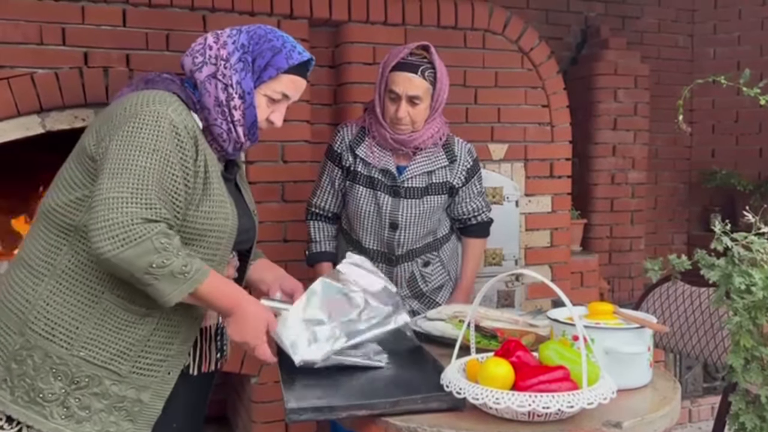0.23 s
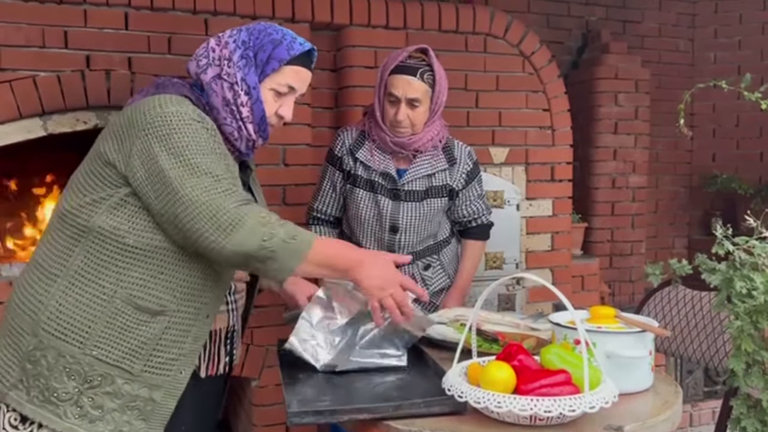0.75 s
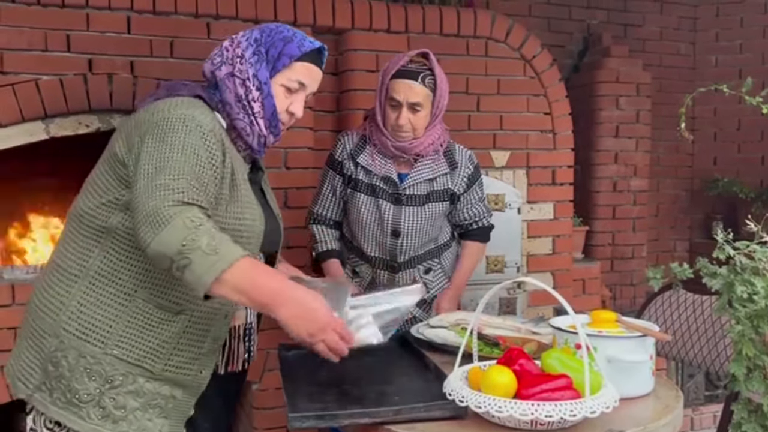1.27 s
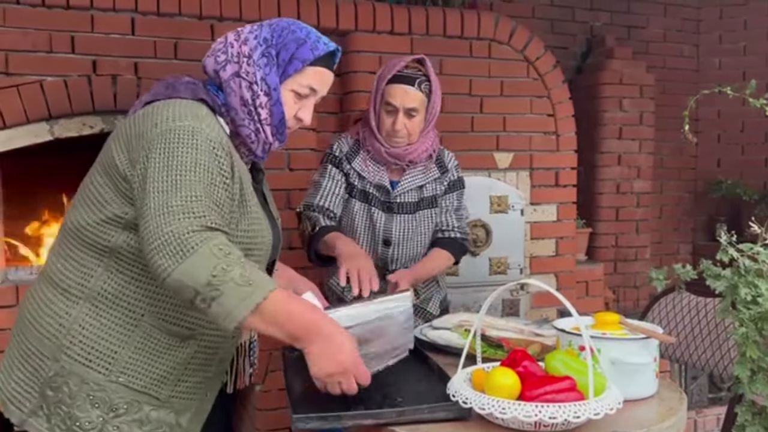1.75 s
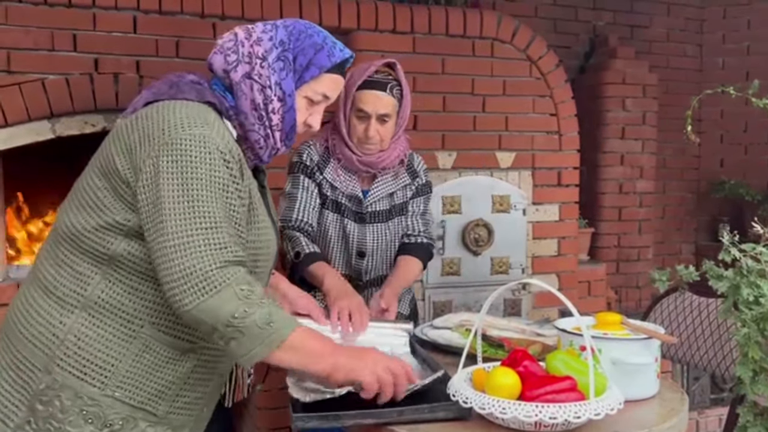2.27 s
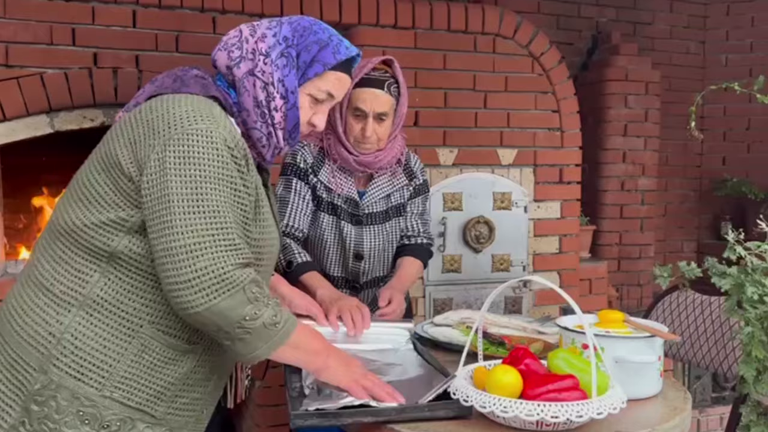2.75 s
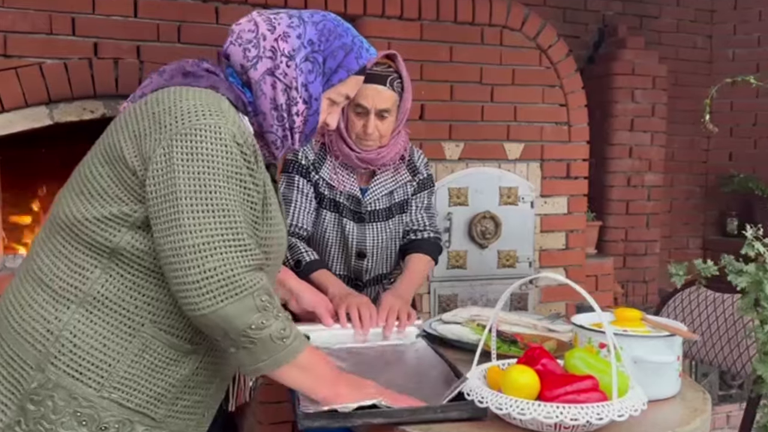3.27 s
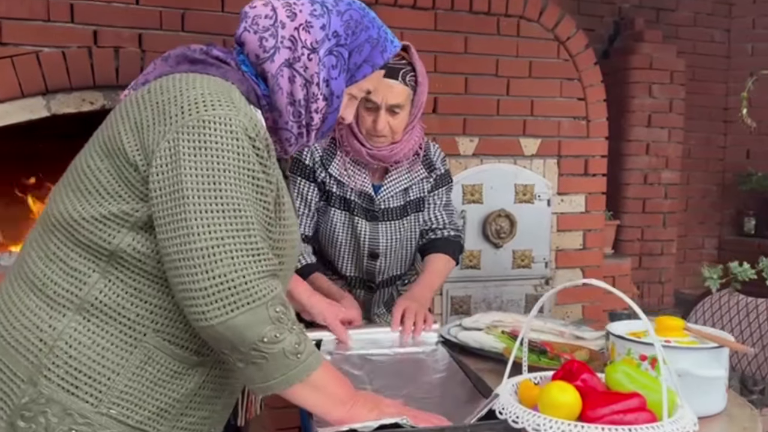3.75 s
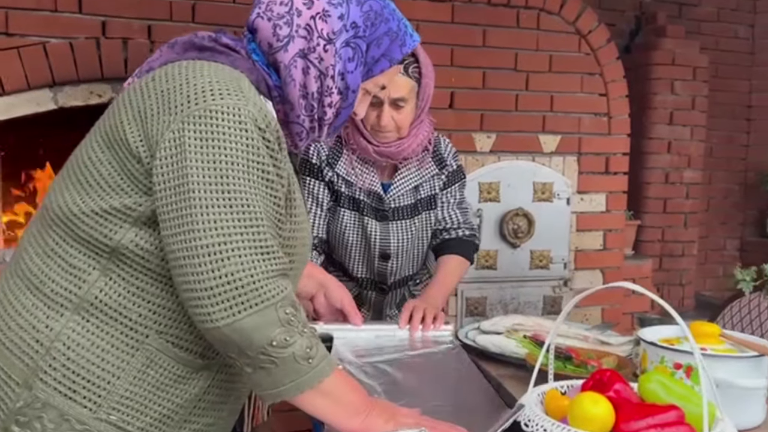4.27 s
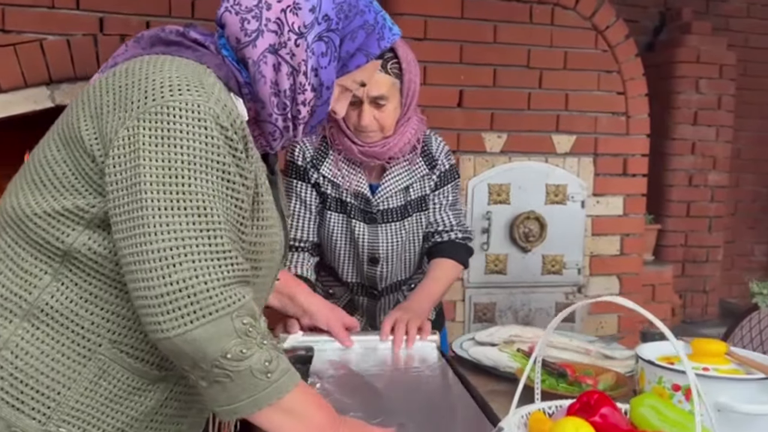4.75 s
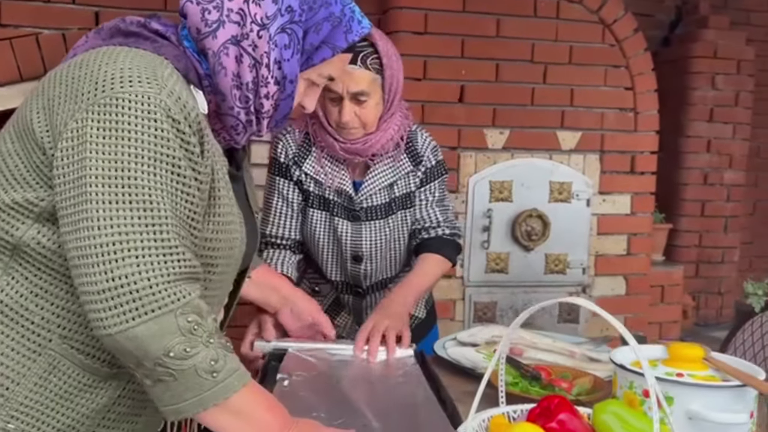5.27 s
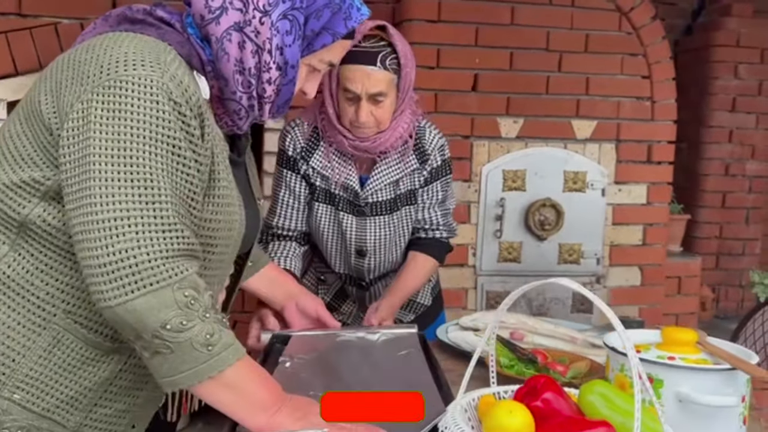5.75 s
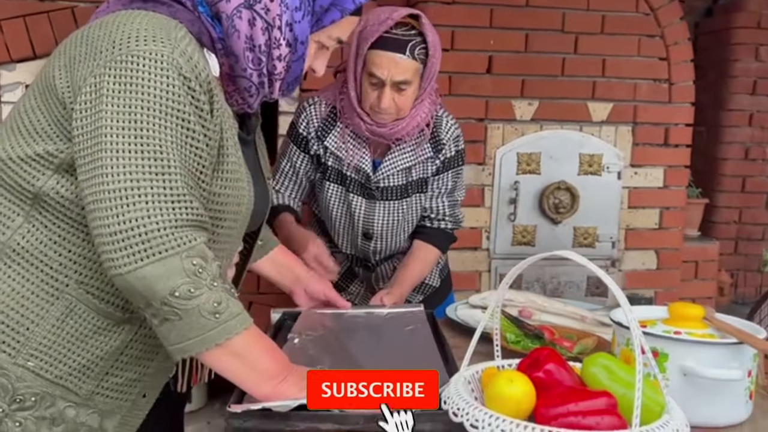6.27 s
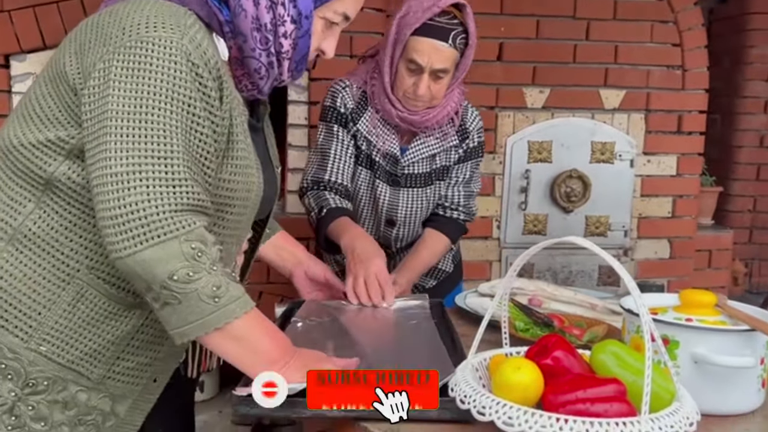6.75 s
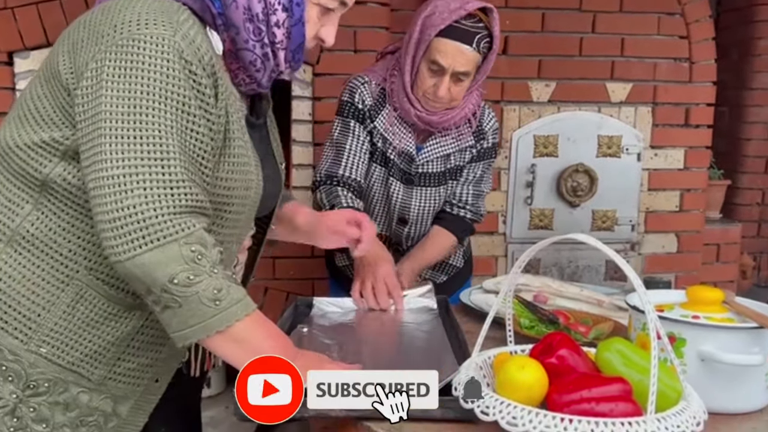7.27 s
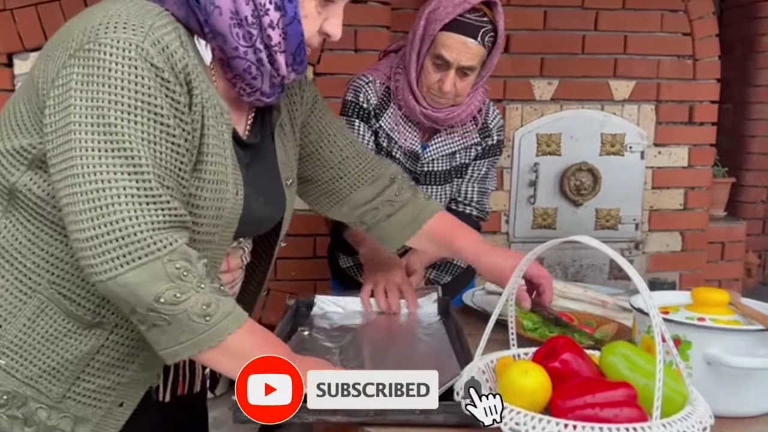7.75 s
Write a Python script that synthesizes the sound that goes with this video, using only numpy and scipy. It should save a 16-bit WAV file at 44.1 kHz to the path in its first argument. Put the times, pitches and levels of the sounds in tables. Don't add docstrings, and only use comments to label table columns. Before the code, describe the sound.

Dry, bright foil rustling with sharp crease snaps, small tray knocks and rim ticks, while light wind rumbles softly against the microphone in a yard.

```python
import sys
import numpy as np
from scipy import signal
from scipy.fft import rfft, irfft, next_fast_len
from scipy.io import wavfile
from scipy.ndimage import uniform_filter1d

SR = 44100
rng = np.random.default_rng(int(sys.argv[2]) if len(sys.argv) > 2 else 0)


def boost(x):
    u = np.asarray(x, float) / 20
    return 10 ** u


def file_out(sig):
    cols = np.atleast_2d(sig).T
    lim = np.clip(cols, -1, 1)
    pcm = np.round(lim * 32767).astype(np.int16)
    wavfile.write(sys.argv[1], SR, pcm)


N = 353625
T = np.arange(N) / SR
CREASE_HZ, FACET_HZ = 7950, 1800

# peak [t/s], buffeting [level/dB], rise [t/s], fall [t/s], rasp re buffeting [level/dB]
GUSTS = [(0.067, -44, 0.14, 0.27, -20), (0.301, -40.5, 0.17, 0.14, 0.2), (0.625, -45.5, 0.12, 0.092, -7.8),
         (0.808, -51, 0.18, 0.53, -0.5), (1.472, -50, 0.22, 0.081, -6.5), (1.909, -48.5, 0.37, 0.19, -5.5),
         (2.364, -50, 0.39, 0.032, -29), (2.466, -44.5, 0.038, 0.52, -13.5), (2.829, -47.5, 0.28, 0.32, -4),
         (3.151, -44, 0.089, 0.025, -19), (3.252, -47.5, 0.035, 0.063, -11),
         (3.412, -47.5, 0.074, 0.48, -22.5), (3.752, -42.5, 0.11, 0.019, -9.5),
         (4.185, -40, 0.27, 0.12, -16), (4.364, -42, 0.019, 0.27, -22.5), (4.778, -46.5, 0.34, 0.2, -13),
         (4.952, -46.5, 0.093, 0.5, -2.5), (5.314, -53.5, 0.053, 1, -1.5), (5.967, -52.5, 0.82, 0.71, -6.5),
         (6.555, -47, 0.28, 0.28, -8), (6.864, -45, 0.26, 0.38, -6.5), (7.17, -33.5, 0.13, 0.038, -14),
         (7.269, -43, 0.1, 0.031, -4), (7.738, -51.5, 0.062, 0.019, -1.5)]
# [f/Hz], [level/dB per Hz]
RUMBLE_TONE = [(15, -36), (25, -11), (46, 1.5), (65, 5), (151, -9), (200, -17.5), (260, -20.5), (440, -120)]
# [t/s], peak [level/dB]
EDDY_SLAPS = [(0.259, -33.5), (0.31, -27.5), (0.428, -34.5), (2.469, -33.5), (2.737, -37.5), (2.818, -50),
              (2.926, -35.5), (3.018, -32), (3.6, -37), (3.724, -33), (4.006, -36.5), (4.119, -36),
              (4.167, -30.5), (4.368, -34.5), (6.848, -44), (7.099, -41), (7.141, -31.5), (7.168, -39),
              (7.238, -39)]
# [t/s], peak [level/dB], pitch [f/Hz]
FINGER_TAPS = [(0.6, -49.5, 834), (2.124, -46.5, 326), (3.23, -48.5, 274), (4.059, -49, 232),
               (4.536, -52.5, 577), (4.963, -41.5, 508), (5.03, -49.5, 815), (5.611, -44, 468),
               (6.656, -48, 353), (7.745, -52.5, 258)]
# [t/s], peak [level/dB], pitch [f/Hz]
RIM_TICKS = [(0.2867, -34, 2160), (1.293, -42, 2480), (2.5845, -36.5, 2140), (4.8145, -54, 2500),
             (5.2689, -32.5, 2190), (5.3303, -30.5, 2360), (5.462, -34.5, 2170), (5.5144, -31.5, 2290),
             (5.6072, -38, 2250), (6.4617, -33.5, 1650), (7.0843, -35, 2260), (7.252, -32, 2420),
             (7.7322, -29.5, 3280), (7.8017, -39.5, 1820), (7.87, -54, 2130)]
# [t/s], peak [level/dB], body re peak [level/dB]
LARGE_POPS = [(0.4567, -35, -3), (2.4273, -27, -12.5), (2.5805, -16, -18), (3.2186, -31, -22),
              (3.626, -27.5, -10), (3.657, -33, -29), (3.685, -22, -22), (3.8217, -28, -16),
              (3.8412, -18.5, -24), (3.9875, -23, -32.5), (4.2266, -28, -26), (4.6896, -33, -10),
              (4.8112, -20, -24), (5.03, -21, -23), (5.224, -26, -16.5), (5.33, -26, -22),
              (5.4615, -32.5, -7), (5.514, -31, -18), (5.853, -26, -18), (5.895, -19, -35),
              (5.9613, -16.5, -32), (7.01, -23, -4), (7.2958, -28, -10), (7.381, -24.5, -4),
              (7.6595, -28, -12), (7.7147, -23.5, -10), (7.7302, -17, -8), (7.7527, -17, -10),
              (7.745, -21, -8), (7.871, -16, -4)]
# [t/s], peak [level/dB], body re peak [level/dB]
SHARP_CRACKS = [(0.3991, -21, -8), (0.6136, -30, -6), (0.7164, -24, -10), (0.9184, -19, -10),
                (1.8009, -27, 2), (2.1366, -21, -16), (2.402, -33, -4), (2.4644, -33, 0),
                (2.5138, -26, -13), (2.9164, -16, -15), (2.9408, -20, -7), (2.9922, -18, -6),
                (3.08, -26, -5), (3.1818, -27, -11), (3.532, -50, 16), (3.5385, -29.5, -5),
                (3.5844, -28.5, -13.5), (3.7126, -31, -4), (3.8717, -24, -10), (3.9146, -15, -18),
                (4.3855, -15, -23), (4.7387, -19, -13), (5.1283, -27, -4), (5.2351, -28, 1.5),
                (5.2441, -29, -11), (5.269, -28.5, 0), (5.293, -27, -12), (5.4661, -29, -10),
                (5.6107, -23, -13), (6.0073, -25, -18), (6.2214, -25, -9), (6.3261, -28, -11),
                (6.3331, -18, -14), (6.374, -32, -7), (6.4049, -33.5, -5), (6.8649, -23, -13),
                (7.1039, -14, -16), (7.1687, -21, 0), (7.256, -30, 1), (7.2889, -28, -14),
                (7.3169, -30, -14), (7.3503, -31.5, -0.5), (7.3742, -25, -9), (7.3932, -25, -6),
                (7.4151, -28, -16), (7.4326, -21, -10), (7.4585, -31, -9), (7.4875, -33, 4),
                (7.496, -28, -1), (7.5214, -21.5, -1.5), (7.6327, -41, -9), (7.685, -28, -8),
                (7.708, -26, -2), (7.7354, -23, -4), (7.7713, -19, -9), (7.8048, -24, -1),
                (7.8152, -22, -9), (7.8452, -18, -12), (7.9634, -32, -11), (8.0143, -24, -15)]
# peak
# [t/s], snaps [level/dB], rise [t/s], fall [t/s], facet ring re snaps [level/dB]
HAND_STROKES = [(0.005, -45.5, 0.057, 0.013, -0.5), (0.231, -36, 0.1, 0.073, -2), (0.39, -42, 0.52, 0.031, -2),
                (0.49, -45, 0.044, 0.04, 0.5), (0.545, -33, 0.053, 0.032, -3.5),
                (0.613, -36.5, 0.035, 0.068, -2.5), (0.745, -45.5, 0.163, 0.012, -2.5),
                (0.844, -36, 0.18, 0.055, -2), (0.931, -35.5, 0.055, 0.16, -2.5),
                (1.075, -38, 0.23, 0.019, -2.5), (1.17, -40.5, 0.056, 0.071, -2.5),
                (1.299, -34.5, 0.075, 0.099, -4), (1.42, -37.5, 0.041, 0.039, -4),
                (1.583, -38.5, 0.18, 0.1, -3.5), (1.749, -39, 0.053, 0.086, -3),
                (1.975, -38.5, 0.079, 0.027, -5), (2.1, -40, 0.22, 0.18, -3), (2.23, -40, 0.42, 0.074, -4.5),
                (2.34, -38.5, 0.11, 0.091, -4), (2.52, -41.5, 0.064, 0.04, -2.5),
                (2.63, -31.5, 0.048, 0.13, -3.5), (2.841, -33, 0.08, 0.12, -3.5), (2.927, -39, 0.013, 0.49, -7),
            (3.276, -32, 0.085, 0.085, -4.5), (3.472, -49.5, 0.028, 0.064, -2),
            (3.543, -48, 0.0087, 0.052, -3), (3.669, -38.5, 0.047, 0.054, -3.5),
            (3.844, -35, 0.052, 0.14, -7), (3.913, -46.5, 0.13, 0.053, -1),
            (4.026, -35.5, 0.07, 0.093, -5.5), (4.249, -42.5, 0.15, 0.16, -6.5),
            (4.483, -29.5, 0.064, 0.077, -7.5), (4.634, -38, 0.061, 0.037, -7.5),
            (4.705, -31, 0.032, 0.037, -7.5), (4.835, -36, 0.018, 0.14, -3.5),
            (4.972, -34.5, 0.074, 0.23, -8.5), (5.181, -37.5, 0.053, 0.011, -2),
            (5.254, -47.5, 0.79, 0.12, -0.86), (5.365, -36.5, 0.056, 0.035, -5.5),
                (5.616, -39, 0.14, 0.079, -4), (5.782, -40.5, 0.042, 0.025, -3),
           (5.905, -35, 0.049, 0.022, -3.5), (5.967, -36.5, 0.13, 0.12, -4),
           (6.093, -33.5, 0.046, 0.043, -4), (6.188, -43, 0.03, 0.076, -1.4),
           (6.232, -40.0, 0.023, 0.035, -2.5), (6.313, -43.5, 0.019, 0.013, -2.5),
           (6.482, -36, 0.1, 0.06, -3.5), (6.577, -43, 0.143, 0.39, -3.7), (6.767, -33.5, 0.093, 0.075, -3),
           (6.917, -34.5, 0.097, 0.072, -4), (7.045, -36, 0.081, 0.17, -3.5),
           (7.161, -36.5, 0.067, 0.14, -3), (7.32, -46.5, 0.032, 0.026, 0),
           (7.389, -41, 0.042, 0.034, -3.5), (7.537, -42.5, 0.11, 0.033, -5),
           (7.742, -37.5, 0.063, 0.054, -3.5), (7.868, -36, 0.083, 0.046, -5),
           (7.954, -45.5, 0.021, 0.17, -4.5), (8.006, -43, 0.0081, 0.148, -3.5),
                (0.3, -51.5, 0.044, 0.06, 3.5), (0.26, -52.5, 0.086, 0.12, -0.5), (5.08, -48, 0.12, 0.16, -0.5),
            (7.818, -36, 0.004, 0.02, -6.5), (1.285, -42, 0.011, 0.046, -3.5),
            (2.583, -34.5, 0.0052, 0.044, -3), (2.67, -36.5, 0.024, 0.025, -2),
            (3.8, -39, 0.0032, 0.027, -10), (4.39, -40, 0.0036, 0.05, -9),
            (4.445, -31.5, 0.056, 0.04, -8.5), (4.51, -36, 0.022, 0.017, -11),
            (4.74, -33, 0.011, 0.037, -9.5), (4.814, -34.5, 0.0027, 0.046, -4.5),
            (4.86, -31, 0.025, 0.014, -18), (7.661, -47, 0.002, 0.027, -4.5),
            (5.463, -51, 0.002, 0.03, -0.5), (7.707, -43, 0.003, 0.026, -7),
            (3.04, -42, 0.059, 0.065, -2.5), (4.945, -49, 0.03, 0.13, 2),
            (5.272, -50.5, 0.0097, 0.022, 2.5), (5.331, -48.5, 0.011, 0.0099, 2),
            (5.463, -50, 0.002, 0.035, 1.5), (5.516, -48.5, 0.012, 0.014, 2),
            (6.2, -44, 0.004, 0.019, -3.5), (7.81, -38.5, 0.014, 0.04, -4), (1.302, -38.5, 0.02, 0.017, -3),
            (1.35, -43, 0.02, 0.015, -4.5), (1.732, -42.5, 0.004, 0.036, -3.5),
            (1.552, -43, 0.015, 0.015, -3.5), (5.57, -48.5, 0.08, 0.08, -0.5),
            (5.41, -50, 0.05, 0.04, -0.5)]
# [t/s], spread of snap sizes [level/dB]
SNAP_SPREAD = [
    (0, -1.8),
    (2.5, 1.5),
    (3.6, 1),
    (5.3, 3.5),
    (6.8, -2.5),
    (7.3, 5),
    (8.02, 9),
]
# [f/Hz], left [level/dB], right [level/dB]
PORT_COLOUR = [(517, -12, -13.5), (1120, -10, -14.5), (1685, -9, -11), (1890, -11, -13), (2570, -8.5, -9),
               (3390, -6, -13), (4970, -6, -15.5), (6060, -8.5, -10.5), (7130, -5, -8.5), (7870, -6, -6.5),
               (8170, -1.5, -7), (8900, -5.5, -4.5), (10040, -8.5, -9), (10900, -14.5, -15.5),
               (11600, -16.5, -16.5), (11800, -22, -22)]
# [f/Hz], likeness [0-1], how far right leads [radians]
PORT_LIKENESS = [(600, 0.85, -0.1), (1130, 0.65, -0.3), (1440, 0.05, -0.6), (2140, 0.8, 0),
                 (2900, 0.7, -2.8), (3500, 0.3, -1.8), (4000, 0.55, -0.3), (6600, 0.45, -0.5),
                 (7450, 0.35, -1.5), (7950, 0.85, 0), (8300, 0.93, 0), (8700, 0.93, 0.2), (9800, 0.62, 1.9),
                 (10400, 0.82, 3.1), (11600, 0.75, 3.1)]
# [t/s], from [f/Hz], to [f/Hz]
TREBLE_OPENINGS = [(0.029, 10500, 11200), (0.119, 11050, 11350), (0.189, 10500, 10900),
                   (0.25, 10500, 10900), (0.337, 10500, 11150), (0.43, 10500, 11550), (0.52, 10850, 11850),
                   (0.589, 10500, 11150), (0.662, 10500, 11300), (0.778, 10500, 11750),
                   (0.871, 10500, 11150), (1.01, 10500, 11550), (1.234, 10500, 10950),
                   (1.373, 10500, 11550), (1.602, 10500, 11150), (1.756, 10500, 11750),
                   (1.942, 10500, 11150), (2.011, 10500, 11150), (2.136, 10500, 10700),
                   (2.276, 10500, 10900), (2.441, 10500, 11150), (2.612, 10500, 11150),
                   (2.72, 11450, 11850), (3.088, 10500, 11600), (3.413, 10500, 11100), (3.59, 10500, 11100),
                   (3.741, 10500, 11050), (3.901, 10500, 11000), (4.124, 10500, 11150),
                   (4.438, 10500, 11550), (4.563, 10500, 11650), (4.647, 10850, 11850),
                   (4.809, 10500, 11150), (4.972, 10500, 11550), (5.065, 10650, 11000),
                   (5.291, 10500, 11600), (5.373, 10500, 11650), (5.599, 10500, 11150),
                   (5.692, 10750, 11100), (5.849, 10500, 11850), (5.93, 10500, 10900),
                   (6.101, 10500, 11600), (6.177, 10500, 11150), (6.255, 10500, 11150),
                   (6.438, 10500, 11850), (6.551, 10500, 11150), (6.83, 10500, 11700),
                   (7.004, 10500, 11150), (7.073, 10500, 11100), (7.143, 10850, 11800),
                   (7.245, 10500, 11500), (7.52, 10500, 10850), (7.602, 10500, 11100),
                   (7.761, 10500, 11850), (7.906, 10500, 11850), (7.996, 10500, 11600)]
# [f/Hz], centre [level/dB], side [level/dB]
ROUNDING_STEPS = [(170, -25, 6), (860, -15, 0), (1200, -10, -5), (1550, -1, -1), (1900, 1, 9),
                  (2240, -1, 9), (2580, 4, 5), (2920, 10, -1), (3270, 3, -2), (3600, -5, -3), (3950, -4, 2),
                  (4300, -6, -3), (4800, -7, -6), (5330, -6, -2), (6000, 3, 5), (6550, 4.5, 12),
                  (7050, 0, 1), (7400, -5, -4), (7750, -1, 7), (8050, -12, 5), (8450, -11, 11),
                  (8800, -12, 7), (9100, -10, -2), (9460, -7, -4), (9800, 2, -5), (10300, 5, -3),
                  (11200, 6, 2), (11900, 6, 7)]
# [t/s], [f/Hz]
TREBLE_EDGE = [(0, 9900), (2.4, 9950), (2.7, 10300), (5.2, 10300), (5.45, 9850), (6, 10100), (8.02, 10100)]


def evened(x):
    return x / np.sqrt(np.mean(x ** 2) + 1e-20)


def read(table, at):
    first, *columns = np.transpose(table)
    return [np.interp(at, first, c) for c in columns]


def band(x, low_hz, high_hz, order=2):
    return signal.sosfilt(signal.butter(order, [low_hz, high_hz], "band", fs=SR, output="sos"), x)


def swells(rows, peak_db, rest_db, steep=1):
    s, _, rise, fall, _ = np.transpose(rows)[..., None]
    coarse = T[::100]
    late = coarse - s
    away = np.where(late < 0, -late / rise, late / fall)
    event_db = peak_db[:, None] - 10 * steep * away
    power = (boost(event_db) ** 2).sum(0) + boost(rest_db) ** 2
    return np.interp(T, coarse, 10 * np.log10(power))


def ports(paths, share=1):
    size = next_fast_len(N)
    hz = np.fft.rfftfreq(size, 1 / SR)
    left_db, right_db = read(PORT_COLOUR, hz)
    same, lead = read(PORT_LIKENESS, hz)
    same = np.clip(same, 0, 1)
    a, b = rfft(paths, size)
    right = np.exp(1j * lead) * (same * a + np.sqrt(1 - same ** 2) * b)
    edge = share / (1 + (hz / 12000) ** 60)
    return irfft(edge * np.array([boost(left_db) * a, boost(right_db) * right]), size)[:, :N]


def slaps():
    out, t = np.zeros(N + 2000), np.arange(2000) / SR
    chance = rng.random((len(EDDY_SLAPS), 2))
    for (s, db), (size, sign) in zip(EDDY_SLAPS, chance):
        hz = 70 + (130 + 90 * size) * np.exp(-t / 0.0143)
        push = np.sin(2 * np.pi * np.cumsum(hz) / SR) * np.minimum(t / 0.0021, 1) * np.sign(sign - .5)
        out[round(s * SR):][:len(t)] += boost(db - 3.5 - 60 * t / 0.14) * push
    return out[:N]


def breeze():
    _, peak_db, _, _, edge_db = np.transpose(GUSTS)
    gust_db = swells(GUSTS, peak_db, rest_db=-62)
    rasp_db = swells(GUSTS, peak_db + edge_db, rest_db=-61.5, steep=1.5)
    lumps = boost(1.8 * evened(band(rng.standard_normal(N), 1.34, 41, order=1)))
    noise = rng.standard_normal((4, N))
    hz = np.fft.rfftfreq(N, 1 / SR)
    rumble = irfft(rfft(noise[:2] * lumps ** 1.13) * boost(read(RUMBLE_TONE, hz)[0]), N)
    rumble /= np.sqrt(uniform_filter1d(rumble ** 2, 5000, axis=1) + 1e-12)
    rasp = evened(band(noise[2:] * lumps ** 2.7, 164, 354))
    centre, side = boost(gust_db) * rumble + boost(rasp_db) * rasp
    side = boost(-15) * side
    return np.array([centre + side, centre - side]) + slaps()


def taps():
    out, t = np.zeros(N + 4000), np.arange(4000) / SR
    for (s, db, hz), air in zip(FINGER_TAPS, rng.standard_normal((len(FINGER_TAPS), len(t)))):
        thud = evened(band(air, 0.36 * hz, 2.8 * hz))
        knock = 1.24 * np.sin(2 * np.pi * hz * t) + 1.02 * thud
        out[round(s * SR):][:len(t)] += boost(db + 6.0 - 60 * t / 0.075) * np.minimum(t / 0.0031, 1) * knock
    return out[:N] * boost(np.array([[.4], [-.4]]))


def ticks():
    out, t = np.zeros((2, N + 3000)), np.arange(3000) / SR
    for s, db, hz in RIM_TICKS:
        notes_hz = hz * np.array([[.96], [1.04], [1.19]])
        ring = np.sin(2 * np.pi * notes_hz * t) * boost(db + 3.0 - 60 * t / 0.04)
        paths = np.array([ring.sum(0), ring[0] - ring[1] + ring[2]])
        out[:, round(s * SR):][:, :len(t)] += paths * np.minimum(t / 0.00027, 1)
    return ports(out[:, :N])


def crumples(t60, count, echo_db=-8, echo_t60=0.087, rise=0.00016):
    t = np.arange(4096) / SR
    fall = boost(-60 * t / t60) * np.minimum(t / rise, 1)
    echoes = boost(-60 * t / echo_t60) * np.minimum(t / 0.0014, 1)
    shape = fall / np.linalg.norm(fall) + boost(echo_db) * echoes / np.linalg.norm(echoes)
    bursts = rng.standard_normal((count, 2, len(t))) * shape
    return bursts / np.linalg.norm(bursts, axis=2, keepdims=True)


def pops(rows, t60, top_db, low_db):
    s, db, body_db = np.transpose(rows)
    out = np.zeros((2, N + 4096))
    top = band(crumples(t60, count=len(s), echo_db=-9, rise=.001), CREASE_HZ, 12000)
    low = band(crumples(t60, count=len(s), echo_db=-9, rise=.0008), 2600, 6400)
    for at, a, b, crack, body in zip(np.round(s * SR).astype(int), db, body_db, top, low):
        crack = crack / abs(crack[0]).max()
        body = body / abs(body[0]).max()
        out[:, at:at + 4096] += boost(a + top_db) * (crack + boost(b + low_db) * body)
    return ports(out[:, :N])


def shower(size, kind, shapes):
    return sum(signal.oaconvolve((size * (kind == k))[None], s, axes=1)[:, :N] for k, s in enumerate(shapes))


def at_level(x, level):
    return x * np.sqrt(np.mean(level ** 2) / np.mean(x.mean(0) ** 2))


def snaps():
    spread_db = read(SNAP_SPREAD, T)[0]
    clumps = evened(band(rng.standard_normal(N), 1.3, 130, order=1))
    size = boost(np.clip(spread_db, 1.2, 3.0) * np.minimum(rng.exponential(1, N), 3.2) + 0.45 * clumps)
    size *= rng.random(N) < 3500 / SR
    return size / np.sqrt(uniform_filter1d(size ** 2, 2000) + 1e-9)


def foil():
    strokes = np.array(HAND_STROKES)
    _, peak_db, _, _, loose_db = strokes.T
    snap_db = swells(strokes, peak_db, rest_db=-75)
    facet_db = swells(strokes, peak_db + loose_db, rest_db=-59)
    flex_db = swells(strokes, peak_db - 2.5 + 3.19 * loose_db, rest_db=-75, steep=0.97)
    size = snaps()
    kind, out = rng.integers(0, 18, N), 0
    hz = np.fft.rfftfreq(next_fast_len(N), 1 / SR)
    blend = np.sqrt(hz ** 6 / (hz ** 6 + FACET_HZ ** 6))
    parts = [(snap_db, CREASE_HZ, 13000, .005, .4, 1),
             (facet_db, FACET_HZ / 2, CREASE_HZ, .01, .6, blend),
             (flex_db, 400, 2 * FACET_HZ, .03, .6, np.sqrt(1 - blend ** 2))]
    for db, low_hz, high_hz, t60, trim_db, share in parts:
        ring = band(shower(size * boost(db), kind, crumples(t60, count=18)), low_hz, high_hz, order=10)
        out = out + boost(trim_db) * at_level(ports(ring, share), boost(db))
    return out


def scene():
    large = pops(LARGE_POPS, t60=.013, top_db=7.5, low_db=2.8)
    sharp = pops(SHARP_CRACKS, t60=.015, top_db=-6.0, low_db=10.0)
    return breeze() + taps() + ticks() + large + sharp + foil()


def thinned(x):
    size, lines, wide = 1024, 560, 16
    start, edge_chance_hz = 70, 130
    window = signal.windows.kaiser_bessel_derived(2 * size, 4 * np.pi)
    basis = np.cos(np.pi / size * (np.arange(2 * size)[:, None] + .5 + size / 2) * (np.arange(lines) + .5))
    basis *= window[:, None] * np.sqrt(2 / size)
    count = N // size + 2
    padding = [(0, 0), (size - start, (count + 1) * size - N - size + start)]
    blocks = np.pad([x[0] + x[1], x[0] - x[1]], padding)
    blocks = blocks.reshape(2, count + 1, size) / 2
    z = np.concatenate([blocks[:, :-1], blocks[:, 1:]], axis=2) @ basis
    t = (np.arange(count)[:, None] * size + start) / SR
    hz = (np.arange(lines) + .5) * SR / 2 / size

    power = uniform_filter1d(z ** 2, size=2 * wide, axis=2)[..., wide // 2::wide]
    power_db = 10 * np.log10(power + 1e-14)
    usual_db = power_db.mean(1, keepdims=True)
    chance = evened(uniform_filter1d(rng.standard_normal(power_db.shape), size=3, axis=1))
    step_db = usual_db + .8 * (power_db - usual_db) + 5 * chance
    step_db = step_db + np.array(read(ROUNDING_STEPS, hz[wide // 2::wide]))[:, None]
    step = boost(np.repeat(step_db, wide, axis=2))
    z = np.sign(z) * step * np.floor(abs(z / step) ** (3 / 4) + .4054) ** (4 / 3)

    s, from_hz, to_hz = np.transpose(TREBLE_OPENINGS)[..., None, None]
    is_open = ((abs(t - s) < .021) & (hz > from_hz - 250) & (hz < to_hz)).any(0)
    z[0] *= is_open | (hz < read(TREBLE_EDGE, t)[0] + edge_chance_hz * rng.standard_normal(t.shape))
    z *= hz < 11930 - 60 + 2 * edge_chance_hz * np.minimum(rng.standard_normal(t.shape), .2)
    halves = z @ basis.T
    centre, side = (halves[:, 1:, :size] + halves[:, :-1, size:]).reshape(2, -1)
    return np.pad([centre + side, centre - side], [(0, 0), (start, size)])[:, :N]


def top_cut(x):
    return signal.sosfilt(signal.butter(12, 11930, fs=SR, output="sos"), x)


def record(dry):
    mix = thinned(dry)
    return top_cut(mix)


dry = scene()
out = record(dry)
file_out(out)
```